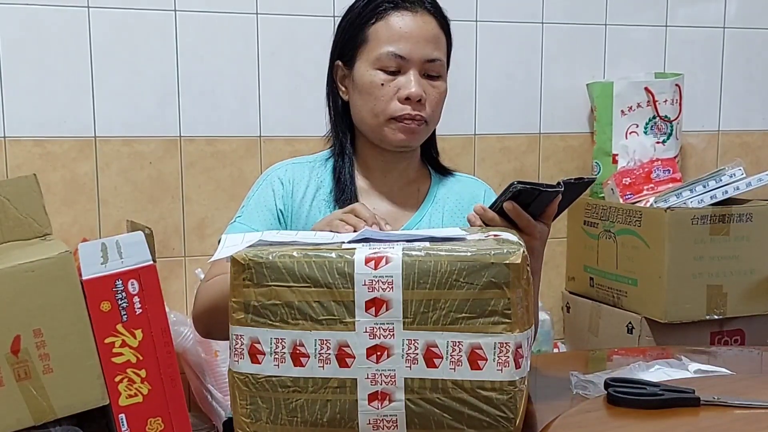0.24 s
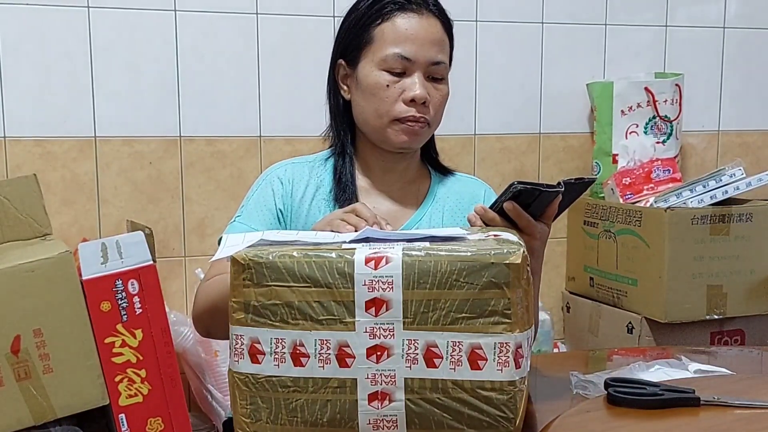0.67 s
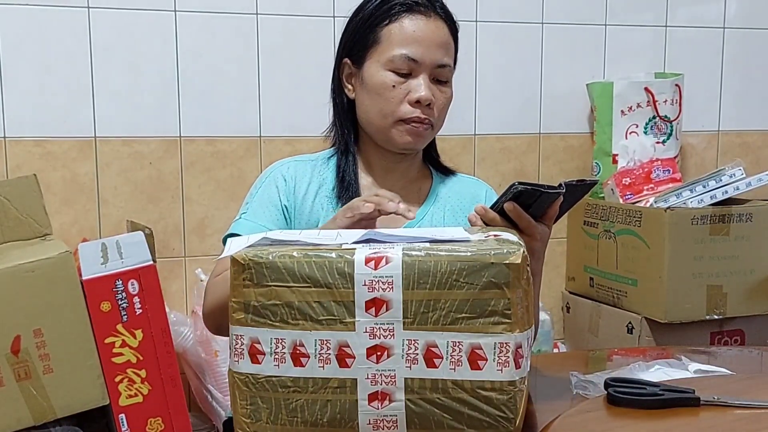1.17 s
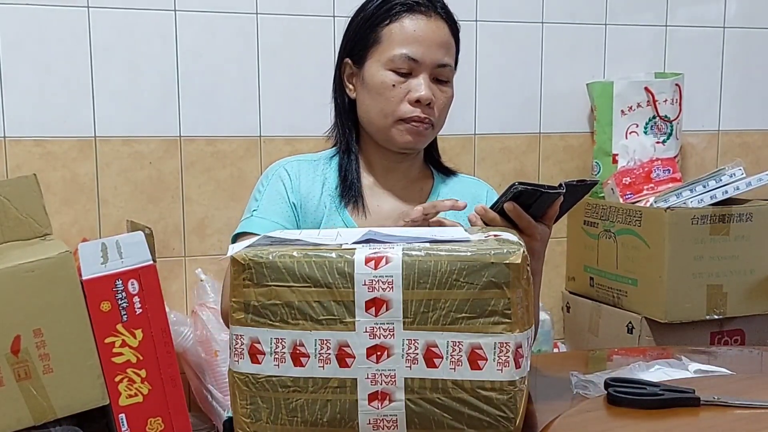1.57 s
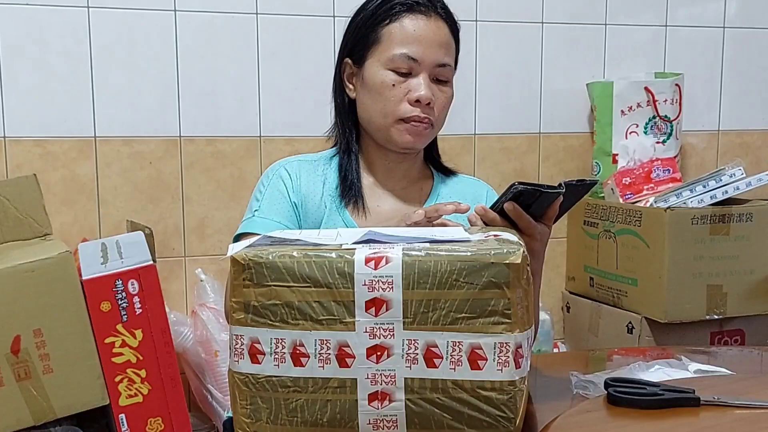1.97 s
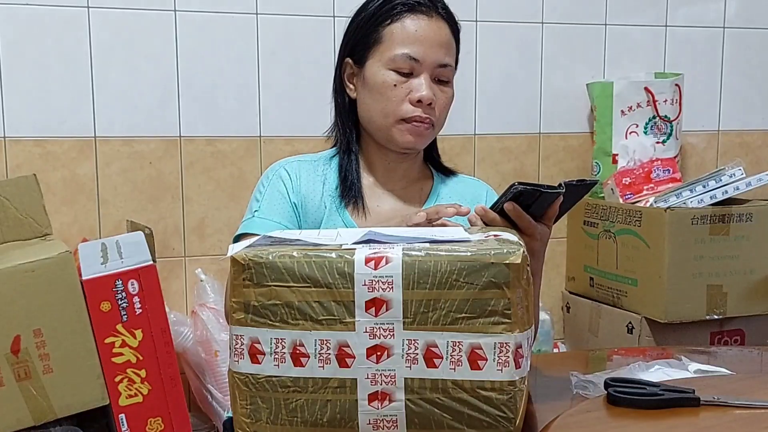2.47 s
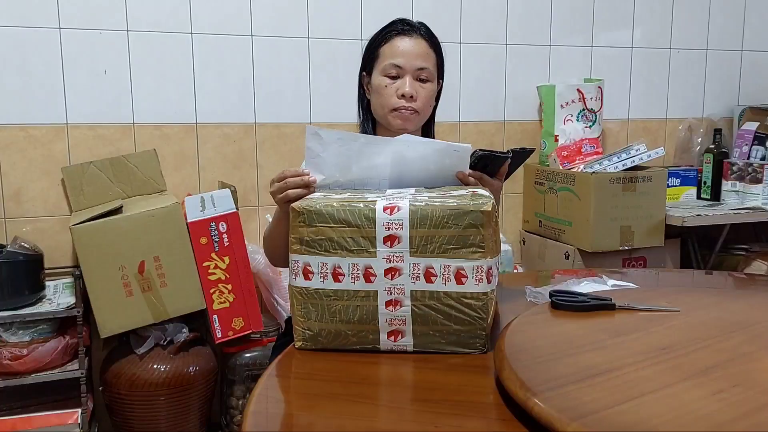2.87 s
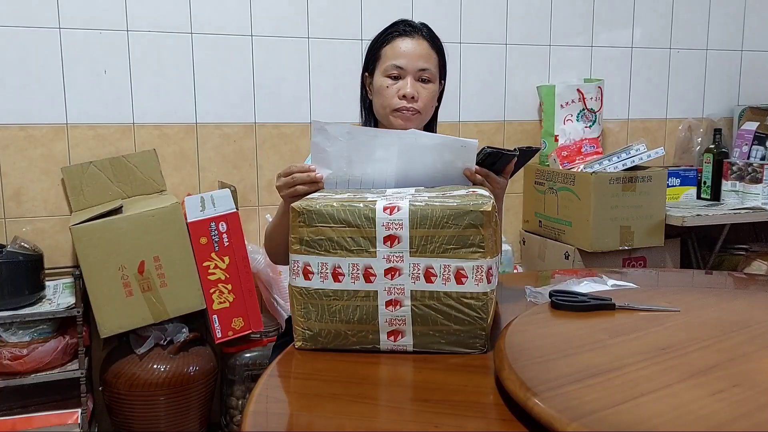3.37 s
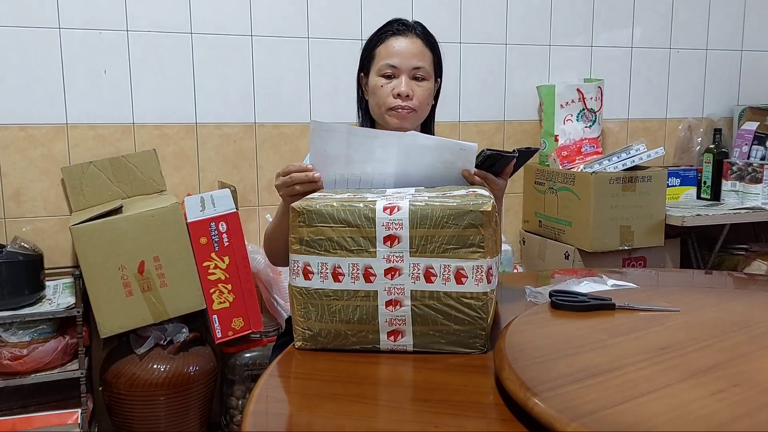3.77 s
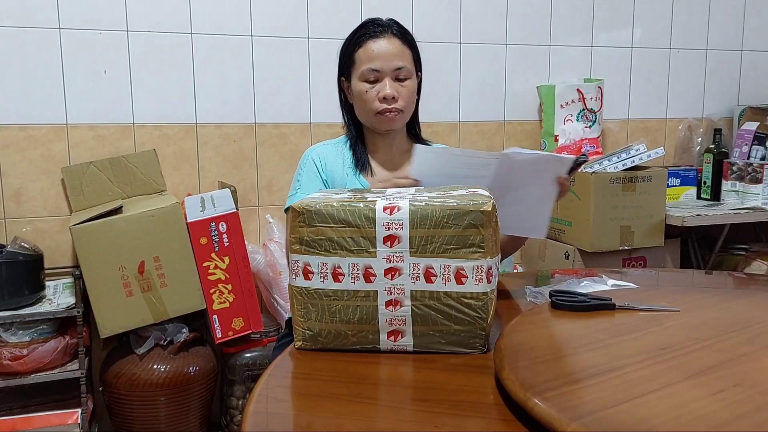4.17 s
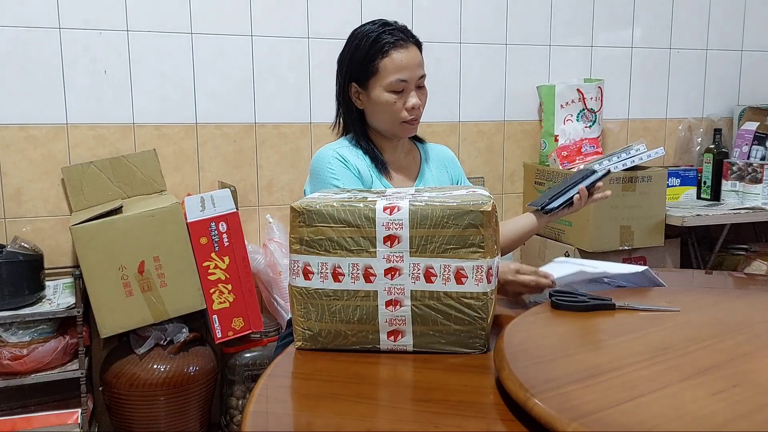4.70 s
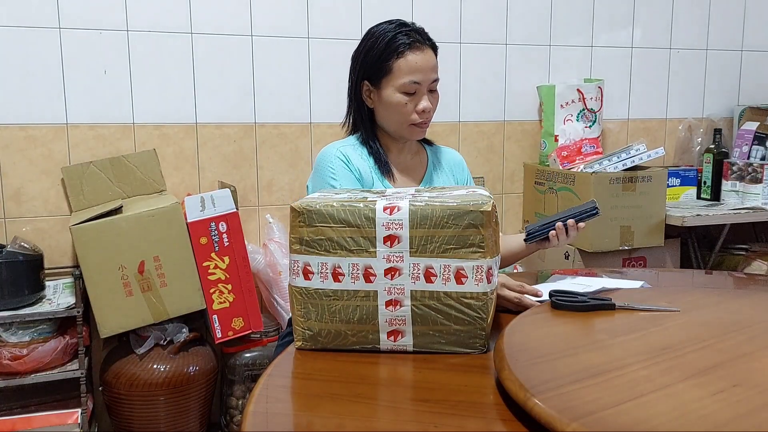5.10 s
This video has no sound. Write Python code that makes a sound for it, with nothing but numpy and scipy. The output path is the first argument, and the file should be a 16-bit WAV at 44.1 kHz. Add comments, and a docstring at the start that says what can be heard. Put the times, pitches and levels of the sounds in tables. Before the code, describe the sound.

A steady, slightly beating low drone fills a hard-walled room, with blowing air and a thin wavering squeal above it. Around the middle a sheet of paper begins to rustle faintly, later swishes more briskly, and finally brushes sharply against a tabletop, a crease or two snapping. The machines run on unchanged, in stereo at room distance.

```python
"""In a small tiled room, a refrigerator compressor and a fan run while a sheet of paper is handled.
The compressor's drone and thin whine are sums of shaft harmonics, with mains hum beside them.
The fan is a blade tone near the casing's tones, so that they beat, over the coloured noise of rushing air.
The sheet is lifted, swung aside and slid onto a wooden table: noise under stroke envelopes, with ticks.
"""
import sys
import numpy as np
from scipy import signal
from scipy.fft import rfft, irfft
from scipy.io import wavfile

SR = 44100
rng = np.random.default_rng(int(sys.argv[2]) if len(sys.argv) > 2 else 0)


def generate_wav(sig):
    """Save sig (samples, or channels by samples) to the path in sys.argv[1] as 16-bit PCM at SR."""
    pcm = np.round(np.clip(np.atleast_2d(sig).T, -1, 1) * 32767).astype(np.int16)
    wavfile.write(sys.argv[1], SR, pcm)


N = 235746
TIME = np.arange(N) / SR  # s

SHAFT_HZ, MAINS_HZ = 58.79, 60.0
EDGE_HZ = 15540  # upper limit of the band
ATTACK_S, RELEASE_S = 0.031, 0.06  # linear onset and exponential decay of a paper stroke
HELD_FROM_S, HELD_DB = 2.88, -57  # faint rustle that persists once the sheet is in the hands

# Levels of tones are nominal: panels, bearings, shaft harmonics and the lowest blade tone also flutter
# slowly and take an overall offset; the mains hum and the upper blade harmonics do not flutter,
# and the upper blade harmonics take no offset.

# Correlation of diffuse noise at two ports. Each row: frequency in Hz, correlation (-1 to 1).
PORT_CORRELATION = [(60, .85), (130, .9), (290, .75), (640, .2), (1400, -.18), (3100, .05), (15000, 0)]
# Level balance of diffuse noise. Each row: frequency in Hz, left minus right in dB.
PORT_BALANCE = [(60, 4), (110, 1.5), (200, 3.5), (700, -0.5), (1300, 2.5), (2400, 1.5), (4400, -2),
                (6500, 0), (8000, -3), (10000, -2.5)]

# Spectrum of the machines' hiss. Each row: frequency in Hz, relative density in dB per Hz.
HISS_SPECTRUM = [(300, 3.5), (1400, -6), (2000, -2), (3100, -0.5), (3600, 1.5), (3950, 1.5), (4300, 0),
                 (4900, -3.5), (6800, -6.5), (8000, -7), (10500, -8), (15500, -7)]
# Narrow resonances within the hiss. Each row: centre in Hz, width in Hz, gain in dB.
HISS_RESONANCES = [(1850, 250, 2), (2800, 150, 1.5), (3400, 70, 3), (3630, 260, 3.5), (4150, 70, 3),
                   (5750, 60, 3), (8000, 400, 2), (9882, 100, 2.5), (13467, 130, 3.5)]
# Colour of the hiss at the left port. Each row: frequency in Hz, gain in dB.
HISS_LEFT_GAIN = [(10000, 0.5), (11500, 1.5), (11900, -13), (12500, -15), (13200, -9), (15500, -2)]
# Spectrum of the rushing air. Each row: frequency in Hz, relative density in dB per Hz.
AIR_SPECTRUM = [(20, -26), (42, -9.5), (100, -8), (165, -4), (195, -1), (255, -2), (345, 4.5), (425, 1.5),
                (480, -5.5), (560, -11.5), (660, -14), (860, -16), (1350, -26), (3000, -46)]

# Steady tones of the casing panels.
# Each row: frequency in Hz, level in dB, left minus right in dB, left lead in radians.
PANEL_TONES = [(137, -55.5, 5, 0), (196.4, -50, -2, -.1), (201.7, -48.5, -2, -.1), (232, -54, 0, 0),
               (282.8, -45, -2, 0), (316.8, -55, 8, -.1), (332.6, -53, 0, -.6), (337.6, -53, 0, -.7),
               (398.3, -50.5, -2, -.1), (436.2, -59, 1, -.8), (506.5, -63, 1, -.1), (528.8, -63, -7, -1.7),
               (578.1, -68, -7, -.7), (769.9, -67, 6, -2), (957, -70, 0, -2.2), (963.7, -70, -1, -2.4)]
# Thin wavering squeal of the bearings.
# Each row: frequency in Hz, level in dB, left minus right in dB, left lead in radians.
BEARING_TONES = [(2862, -74, 0, -.5), (4133.5, -66, 3, -2.2), (4145, -70, -2, 1.3), (5551, -77, -3, -1),
                 (5735, -79, -1, .3), (8080, -79, -5, -.4), (9882, -81, -1, 0), (13467, -80, -10, .9)]

# Harmonics of the fan blades.
# Each row: multiple of the blade rate, level in dB, left minus right in dB, left lead in radians.
BLADE_HARMONICS = [(1, -37, -1, -.3), (2, -49.5, 0, -.6), (4, -61.5, 4, -1.3)]
# Blade rate over time. Each row: time in seconds, blade rate in Hz.
BLADE_RATE = [(0, 190.9), (1.3, 190.9), (2.7, 188), (2.9, 192.5), (5.35, 191)]
# Swells of the lowest blade tone. Each row: middle in seconds, length in seconds, rise in dB.
BLADE_SWELLS = [(1.15, 0.17, 2.5), (1.5, 0.16, 2.5), (2.22, .2, 2), (2.92, 0.24, 3), (3.4, .25, 3),
                (4.29, 0.25, 6), (4.758, 0.35, 4), (5.2, 0.24, 4)]

# Harmonics of the compressor.
# Each row: multiple of the shaft speed, level in dB, left minus right in dB, left lead in radians.
SHAFT_HARMONICS = [(2, -44.7, 4, 0), (3, -59, 3, -.5), (4, -52, -3, -.1), (5, -51.5, 1, .2),
                   (6, -51, 6, .9), (7, -52.5, 1, -.4), (8, -53.5, -4, -1.6), (10, -69, 4, -.8),
                   (11, -60, 6, -.6), (13, -61, 2, -.9), (14, -62.5, -1, 1.8), (16, -68, 0, -2.2),
                   (17, -64, 6, -1.3), (46, -72, -7, -2.7), (49, -75, 2, -.2), (55, -71, 9, 1.5),
                   (57, -75, 2, .2), (58, -62.5, 1, -1.1), (60, -61.3, -3, 2.1), (61, -57.3, 3, .7),
                   (62, -61.3, -3, -1.5), (63, -64.3, -3, -1.2), (64, -60.3, -7, -.7), (65, -74, 3, -2.5),
                   (71, -64, 6, -1.8), (74, -71, -10, -2.1), (89, -72, -7, 1.1)]
# Magnetic hum.
# Each row: multiple of the mains frequency, level in dB, left minus right in dB, left lead in radians.
MAINS_HARMONICS = [(2, -55.5, 8, .4), (4, -56, 2, .7), (6, -44.8, 5, .1), (8, -59.5, -1, -2.7)]

# Spectrum of sliding paper. Each row: frequency in Hz, relative density in dB per Hz.
PAPER_SPECTRUM = [(300, -4), (800, 10), (1300, 4), (2300, 4.5), (3200, 0.5), (4200, 2), (6500, -4.5),
                  (10000, -6), (12500, -7), (15500, -10.5)]
# Colour of the paper at the left port. Each row: frequency in Hz, gain in dB.
PAPER_LEFT_GAIN = [(1000, 2.5), (4000, -1), (10500, 2), (13000, -4), (15500, -2)]
# Paper strokes, from lifting the sheet to sliding it on the table.
# Each row: start in seconds, length in seconds, level in dB, brightness in dB per octave.
PAPER_STROKES = [(2.877, 0.14, -56, -1), (3.017, .06, -51.5, 1), (3.55, 0.47, -63.5, -5.5),
                 (3.79, .12, -56, 0), (3.93, .1, -50, 0.5), (4.066, 0.24, -53.5, 3.5),
                 (4.29, 0.15, -50, 2.5), (4.45, 0.18, -57.5, -0.5), (4.62, 0.097, -45, 1.7),
                 (4.76, .07, -47.5, -1), (4.86, 0.05, -44.5, 4), (4.9, 0.069, -43.5, 0.2)]
# Snapping creases.
# Each row: start in seconds, level in dB, centre in Hz, width in octaves, decay time in seconds.
CREASE_SNAPS = [(3.034, -42, 10000, .8, .0025), (3.762, -48, 6300, .16, .005), (4.014, -51, 6000, .8, .008),
                (4.92, -49, 2400, .2, .018), (5.0, -53, 2300, .09, .022)]


def gain_of(db):
    """Definition of the decibel: an amplitude ratio is 10 to the power dB / 20."""
    return 10 ** (np.asarray(db) / 20)


def evened(x):
    """Normalization: division by the root mean square gives unit rms."""
    return x / np.sqrt(np.mean(x ** 2) + 1e-20)


def read(points, hz):
    """Interpolation of a spectrum, linear along a logarithmic frequency axis."""
    f, value = np.transpose(points)
    return np.interp(np.log(hz + 1), np.log(f + 1), value)


def drift(rate_hz):
    """Low-frequency random modulation: noise under a Gaussian spectrum, of zero mean and unit rms."""
    size = 8192
    hz = np.fft.rfftfreq(size, N / SR / size)
    spectrum = rfft(rng.standard_normal(size)) * np.exp(-(hz / rate_hz) ** 2) * (hz > 0)
    slow = evened(irfft(spectrum, size))
    return np.interp(TIME, np.linspace(0, N / SR, size), slow)


def diffuse(points, ripple_db=2.45, ripple_hz=35):
    """Diffuse field: two ports hear alike in the bass, unlike in the treble; reflections ripple the spectrum."""
    hz = np.fft.rfftfreq(N, 1 / SR)
    shared, separate = rfft(rng.standard_normal((2, N)))
    same = np.clip(read(PORT_CORRELATION, hz), -1, 1)
    lean_db = read(PORT_BALANCE, hz)
    left = shared * gain_of(lean_db / 2)
    right = (same * shared + np.sqrt(1 - same ** 2) * separate) * gain_of(-lean_db / 2)
    steps = rng.standard_normal(size=2048)
    ripple = np.interp(hz / ripple_hz, np.arange(len(steps)), steps)
    ripple = ripple * np.minimum(hz / 900, 1)  # weaker in the bass
    colour = gain_of(read(points, hz) + ripple_db * ripple)
    return evened(irfft(np.array([left, right]) * colour, N))


def shaded(pair, points):
    """Linear filtering: a frequency-dependent gain recolours the left port, mainly its top octave."""
    hz = np.fft.rfftfreq(N, 1 / SR)
    left = irfft(rfft(pair[0]) * gain_of(read(points, hz)), N)
    return np.array([left, pair[1]])


def tone(turns, db, lean_db, lead):
    """Standing waves: one sine has another level and phase at each port."""
    sides = gain_of([[lean_db / 2], [-lean_db / 2]])
    angle = 2 * np.pi * (turns % 1) + np.array([[lead / 2], [-lead / 2]])
    return np.sqrt(2) * gain_of(db) * evened(sides) * np.sin(angle.astype(np.float32))


def wavering(rows, sway, flutter_db):
    """Independent modulation: each tone wavers by itself in phase (sway in turns) and level."""
    total = np.zeros((2, N))
    for hz, *rest in rows:
        turns = hz * TIME + sway * drift(4.0) + rng.random()
        total += tone(turns, *rest) * gain_of(flutter_db * drift(5.2))
    return total


def hiss(level_db=-50.0, flicker_db=0.5):
    """Resonant colouring: narrow peaks whistle faintly within the even hiss of the running machines."""
    hz = np.fft.rfftfreq(N, 1 / SR)
    lift_db = sum(db / (1 + (2 * (hz - centre) / width) ** 2) for centre, width, db in HISS_RESONANCES)
    sound = evened(irfft(rfft(diffuse(HISS_SPECTRUM)) * gain_of(lift_db), N))
    level = gain_of(level_db + flicker_db * drift(13))
    return level * shaded(sound, HISS_LEFT_GAIN)


def air(rush_db=-38.0, swell_db=0.8):
    """Turbulence: the fan's air stream radiates low broadband noise of unsteady level."""
    return gain_of(rush_db + swell_db * drift(7.9)) * diffuse(AIR_SPECTRUM)


def casing(panel_db=0, bearing_db=-1):
    """Structural radiation: the panels sing fairly steadily, the bearings waver more in phase."""
    panels = wavering(PANEL_TONES, sway=0.044, flutter_db=3.0)
    bearings = wavering(BEARING_TONES, sway=0.35, flutter_db=1.0)
    return gain_of(panel_db) * panels + gain_of(bearing_db) * bearings


def fan(level_db=-1.0, sway=0.009, flutter_db=0.5):
    """Blade-passing tone: uneven inflow shakes its phase (sway in turns) and swells its lowest harmonic."""
    rate_hz = np.interp(TIME, *np.transpose(BLADE_RATE))
    turns = np.cumsum(rate_hz) / SR + sway * drift(8.0)
    swell_db = sum(db * np.exp(-(2 * (TIME - s) / length) ** 2) for s, length, db in BLADE_SWELLS)
    first, *overtones = [tone(k * turns, *rest) for k, *rest in BLADE_HARMONICS]
    # the level offset applies to the lowest tone alone
    return gain_of(level_db + swell_db + flutter_db * drift(5.7)) * first + sum(overtones)


def compressor(level_db=0, wander=0.0001, flutter_db=2.0):
    """Harmonic series and beats: multiples of a nearly constant shaft speed beat against mains hum."""
    shaft_turns = np.cumsum(SHAFT_HZ * (1 + wander * drift(1.1))) / SR
    drone = np.zeros((2, N))
    for k, *rest in SHAFT_HARMONICS:
        # the room scrambles the phases; each harmonic swells by itself, the high ones least
        swell_db = flutter_db * (k / 2) ** -0.15 * drift(6.7)
        drone += tone(k * shaft_turns + rng.random(), *rest) * gain_of(swell_db)
    hum = sum(tone(k * MAINS_HZ * TIME + rng.random(), *rest) for k, *rest in MAINS_HARMONICS)
    return gain_of(level_db) * (drone + hum)


def snaps(room_db=-15, room_t60=0.17):
    """Impulsive release and reverberation: a crease ticks as it lets go, and the tiles return a faint tail."""
    out = np.zeros((2, N))
    t = np.arange(SR // 4) / SR
    hz = np.fft.rfftfreq(len(t), 1 / SR)
    for s, db, centre_hz, width, decay in CREASE_SNAPS:
        colour = np.exp(-0.5 * (np.log2((hz + 1) / centre_hz) / width) ** 2)
        burst = evened(irfft(rfft(rng.standard_normal((2, len(t)))) * colour, len(t)))
        tick = np.exp(-t / decay)
        tail = gain_of(room_db - 60 * t / room_t60)  # falls 60 dB in room_t60 seconds
        start = round(s * SR)
        out[:, start:start + len(t)] += gain_of(db) * burst * (tick + tail)
    return out


def stroke(t, length):
    """Amplitude envelope: the grip sets in linearly, holds, and decays exponentially after the stroke."""
    return np.clip(t / ATTACK_S, 0, 1) * np.exp(-np.maximum(t - length, 0) / RELEASE_S)


def paper(grain_db=0.6, grain_hz=260, pivot_hz=4000):
    """Stick-slip friction: catching fibres make grainy noise, tilted in spectrum for each stroke."""
    noise = diffuse(PAPER_SPECTRUM, ripple_db=-0.5, ripple_hz=168.0)
    hz, t, z = signal.stft(noise, SR, nperseg=512)
    octaves = np.log2(np.maximum(hz, 700) / pivot_hz)[:, None]
    power = np.zeros(z.shape[-2:])
    for s, length, db, tilt in PAPER_STROKES:
        power += (gain_of(db + tilt * octaves) * stroke(t - s, length)) ** 2
    held = gain_of(HELD_DB) * stroke(t - HELD_FROM_S, N / SR)
    rub = signal.istft(z * np.sqrt(power + held ** 2), SR, nperseg=512)[1][:, :N]
    return shaded(rub, PAPER_LEFT_GAIN) * gain_of(grain_db * drift(grain_hz))


def scene():
    """Superposition: the pressures of the machines and of the handled paper add."""
    return hiss() + air() + casing() + fan() + compressor() + snaps() + paper()


def record(dry):
    """Band limitation: a linear-phase low-pass filter removes what lies above the upper edge."""
    edge = signal.firwin(2047, EDGE_HZ, window=("kaiser", 9), fs=SR)
    return signal.oaconvolve(dry, edge[None], "same")


dry = scene()
out = record(dry)
generate_wav(out)
```